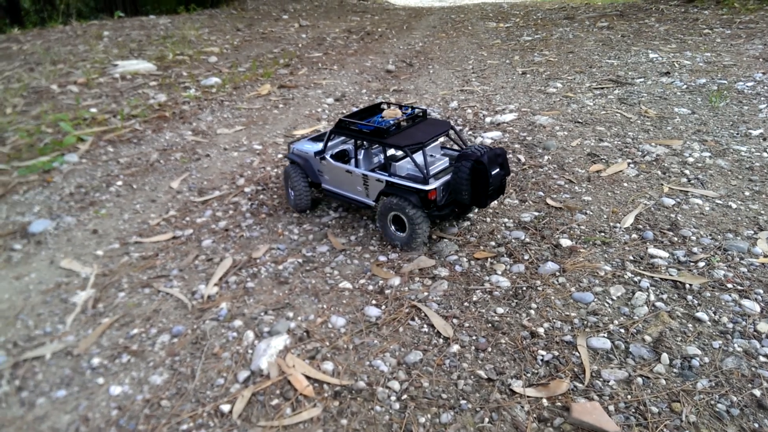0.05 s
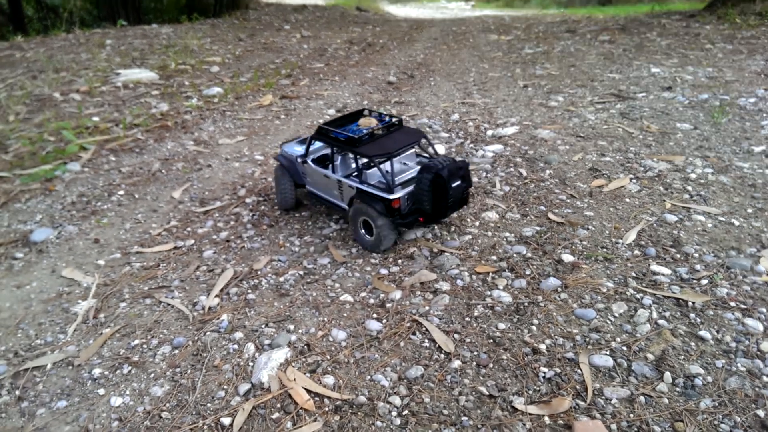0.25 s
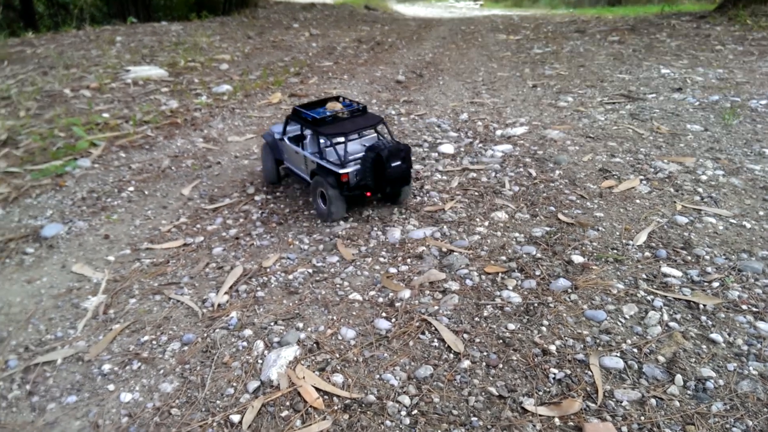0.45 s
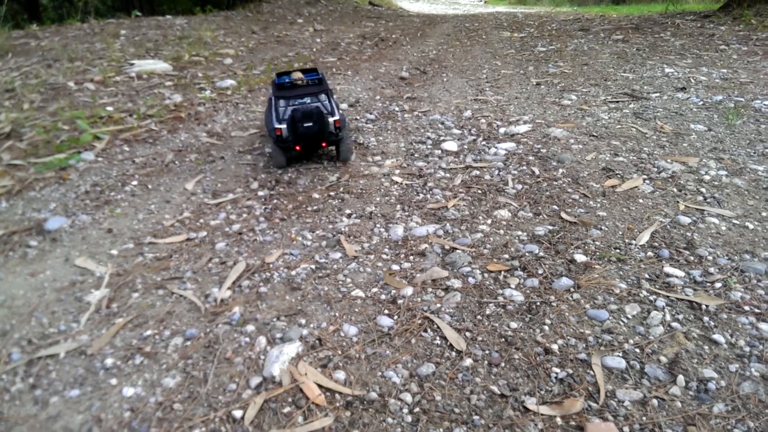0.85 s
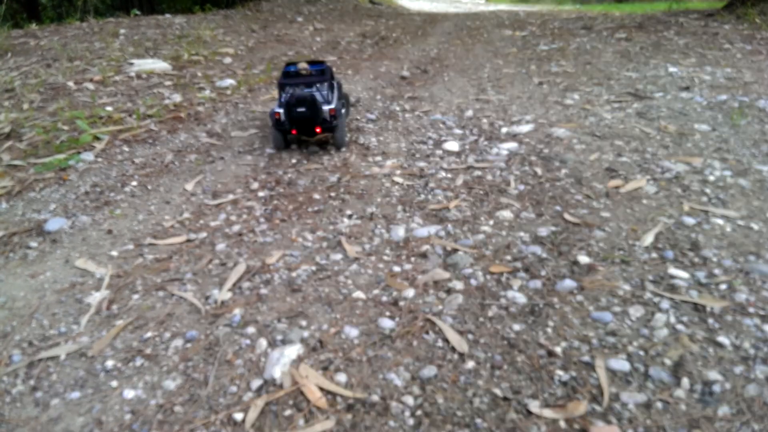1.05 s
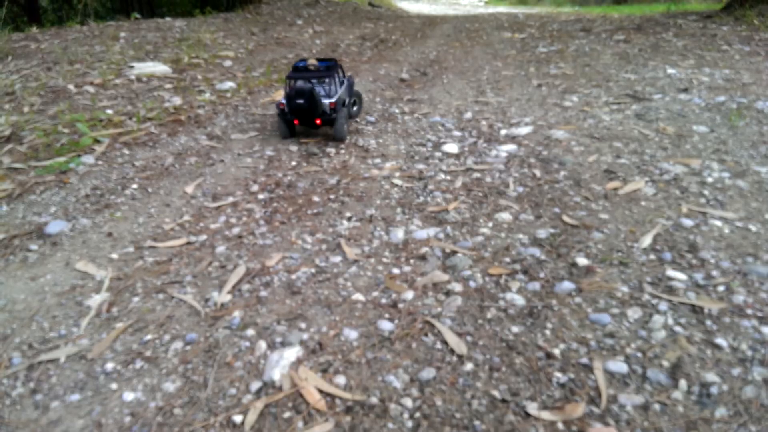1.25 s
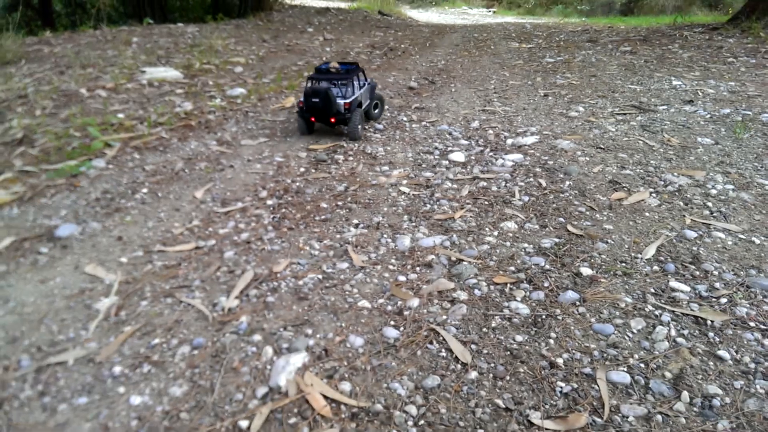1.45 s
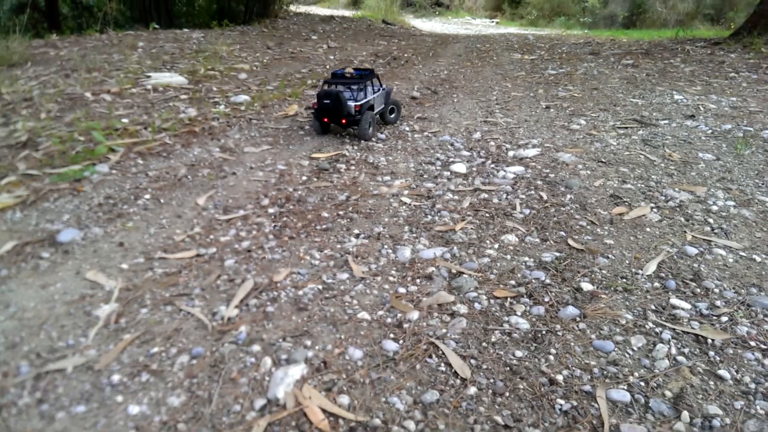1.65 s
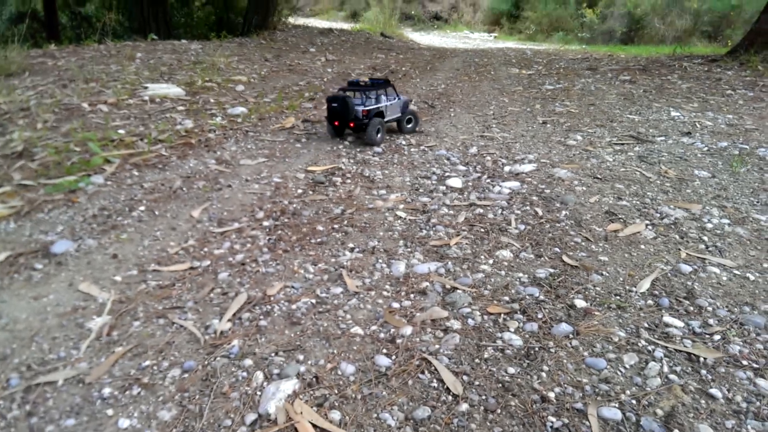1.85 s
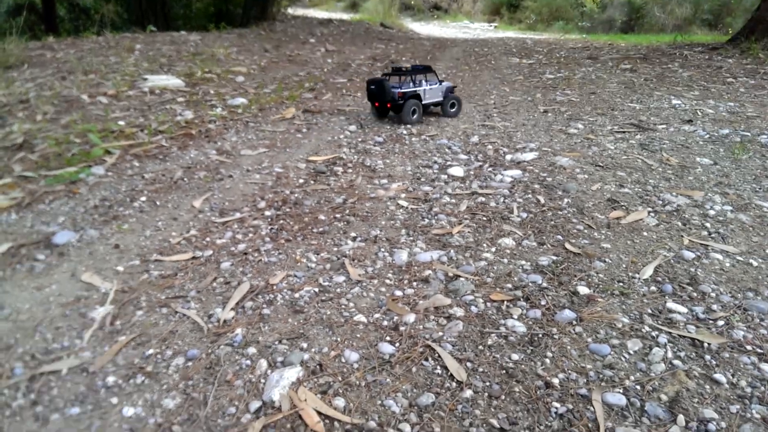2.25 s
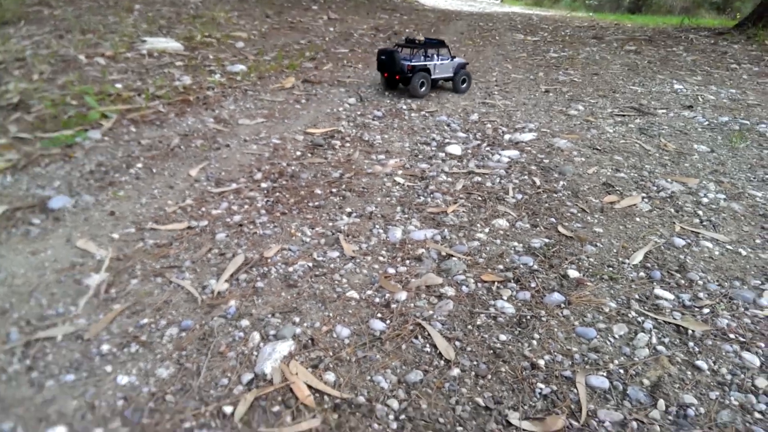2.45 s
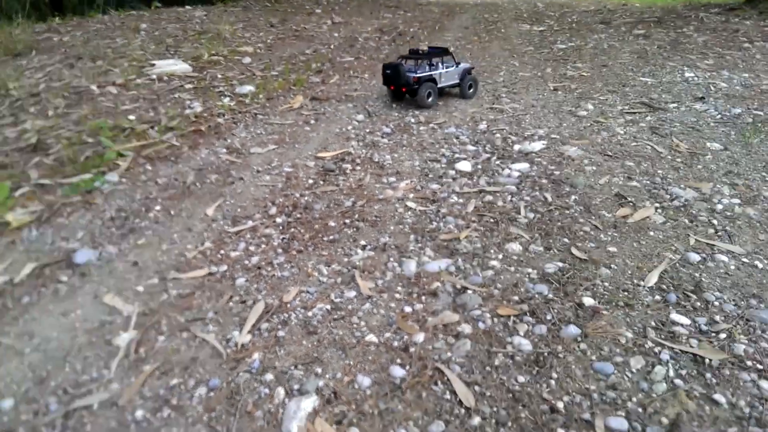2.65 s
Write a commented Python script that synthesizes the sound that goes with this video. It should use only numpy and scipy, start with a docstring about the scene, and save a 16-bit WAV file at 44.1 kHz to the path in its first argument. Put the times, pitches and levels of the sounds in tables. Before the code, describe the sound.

The electric motor and gears of a toy car whine and rasp in uneven bursts on a quiet gravel path, slightly to the left. Small stones scrape under the tyres, and loose parts clack as it slows.

```python
"""The gears of a radio-controlled toy truck whine as it drives over gravel in bursts of throttle.
Meshing teeth make a harmonic tone, and their backlash rasps and excites the resonant plastic body.
The free-running motor sings, and the speed controller's switched current whistles thinly.
Tyres rumble, crunch and scuff, pebbles scrape and loose chassis parts clack over quiet outdoor air."""
import sys
import numpy as np
from scipy.fft import rfft, irfft, next_fast_len
from scipy.io import wavfile
from scipy.ndimage import uniform_filter1d, map_coordinates

SR = 44100
rng = np.random.default_rng(int(sys.argv[2]) if len(sys.argv) > 2 else 0)


def pcm_store(signal):
    """Save signal as 16-bit PCM."""
    levels = np.round(np.clip(np.atleast_2d(signal), -1, 1) * 32767)
    wavfile.write(sys.argv[1], SR, levels.astype(np.int16).T)


N = 119070
T = np.arange(N) / SR

# Spectra of the air, tyres, grit, mesh tone, its overtones and the gear rasp.
# Each row: frequency in Hz, gain in dB.
AIR_SPECTRUM = [(25, -4.5), (60, -0.5), (200, 1), (600, -5), (1000, -3), (1500, -1), (2500, -6.5),
                (4500, -11), (7000, -19.5), (10000, -19), (12300, -20.5), (15800, -27)]
ROLL_SPECTRUM = [(25, -67), (70, -10), (150, -2), (400, 2.5), (700, 3.5), (1100, -1.5), (2200, 0.5),
                 (4000, -19), (9000, -48)]
GRIT_SPECTRUM = [(500, -25), (2000, -37), (4500, 15), (7000, 8), (9800, -5), (12300, 9), (15500, -1)]
WHINE_SPECTRUM = [(300, -49), (600, 4.5), (950, -5.5), (1200, 2.5), (1680, 0.5), (1850, -2.5), (2100, -12)]
OVERTONE_SPECTRUM = [(600, -12), (1000, -8), (1350, 9), (1800, 1.5), (2250, 1.5), (2700, 2.5), (3300, -3.5),
                     (3800, -1.5), (4800, 0.5), (5250, -11), (7000, -6), (10000, -25)]
RASP_SPECTRUM = [(800, -21), (2000, -12), (3200, -4), (3800, 2.5), (4800, 3.5), (5300, -13), (6800, -13),
                 (9000, -28), (16000, -16)]
# Envelopes of the rumble, grit, controller and rasp. Each row: time in seconds, relative level in dB.
ROLL_LEVEL = [(0, -72), (.45, -53), (1, -61.5), (2.36, -62), (2.48, -69), (2.65, -64)]
GRIT_LEVEL = [(0, -81), (.28, -88), (.34, -68.5), (.52, -66.5), (.68, -72.5), (.8, -73.5), (1.1, -75.5),
              (1.52, -82), (1.62, -74.5), (2.18, -72), (2.3, -74.5), (2.55, -72.5), (2.7, -78)]
WHISTLE_LEVEL = [(0, -62), (.2, -66), (.38, -63), (.55, -75), (1.08, -73), (1.115, -85), (1.127, -67),
                 (1.42, -73.5), (1.5, -82.5), (2.24, -68), (2.34, -100)]
RASP_LEVEL = [(.15, -80), (.19, -57.5), (.28, -55.5), (.35, -43.5), (.5, -51.5), (.7, -56.5), (.75, -66),
              (.85, -52.5), (1, -70), (1.07, -55), (1.16, -73), (1.24, -68), (1.33, -60.5), (1.52, -74),
              (1.6, -54), (1.75, -56), (2.19, -51.5), (2.23, -60.5), (2.7, -68)]
# Likeness of the two channels. Each row: frequency in Hz, correlation.
COHERENCE = [(30, 0.52), (250, 0.89), (1000, 0.73), (2500, .5), (5000, -0.16), (9000, 0.02), (15000, -0.04)]
# Stereo balance of the drive. Each row: frequency in Hz, left minus right in dB.
DRIVE_BALANCE = [(450, 9), (740, 0.5), (1220, 6.5), (2010, 3), (3330, -5), (5500, -1), (9080, 2),
                 (15000, -3)]
# Pebbles under the tyres. Each row: centre in seconds, relative level in dB.
PEBBLE_SCRAPES = [(.492, -55.5), (0.634, -59), (0.669, -56.5), (.72, -60), (.855, -60), (0.954, -55.5),
                  (1.075, -62.5)]
# Wheels in hollows. Each row: start in seconds, level in dB, band centre in Hz.
SCUFFS = [(0.473, -53, 454), (0.499, -51.5, 650), (1.686, -51, 420), (1.75, -61, 109), (2.17, -49.5, 588)]
# Chassis impacts. Each row: start in seconds, peak in dB, spectral tilt in dB per octave.
IMPACTS = [(.72, -41.5, 5), (1.2997, -33.5, 5), (1.308, -38.5, 3), (2.3872, -22.5, 5.5), (2.391, -33, -1.5),
           (2.3974, -28, -3), (2.399, -30, 2), (2.406, -30, -0.5), (2.511, -46, 5), (2.561, -41, -4)]
# Chassis modes. Each row: frequency in Hz, relative level in dB, time to fall 60 dB in seconds.
CHASSIS_MODES = [(551.8, -11, 0.13), (1492, -6, 0.055), (1684, 8.5, 0.031), (2440, -15, 0.12),
                 (3420, -6, 0.083), (4420, -3, 0.036), (5720, -30, 0.0087)]
# The motor's high note. Each row: time in seconds, frequency in Hz, relative level in dB.
MOTOR_NOTE = [(.24, 3980, -57), (.29, 4260, -65), (.345, 4250, -49.5), (.385, 4750, -58.5),
              (.44, 4720, -59.5), (.475, 4756, -53), (.54, 4767, -55), (.57, 4554, -56), (.6, 4760, -54),
              (.645, 4880, -57), (.665, 5170, -60), (.7, 4575, -63), (.735, 4600, -93), (.752, 5296, -67),
              (.768, 5070, -50.5), (.79, 4910, -50), (.83, 4850, -53.5), (.86, 4560, -56),
              (.878, 4850, -61.5), (.925, 4850, -63)]
# Resonances of the plastic body. Each row: centre in Hz, half-width in Hz, gain in dB.
BODY_MODES = [(637, 63, -11), (1292, 115, -1), (1658, 81, 0.5), (2225, 75, -2.5)]
# Gear speed. Each row: time in seconds, tooth-mesh frequency in Hz.
MESH_RATE = [(0, 608.4), (.05, 688), (.16, 482.7), (.22, 564.8), (.3, 950), (.345, 1400), (.375, 1574),
             (.41, 1636), (.46, 1856), (.56, 1949), (.76, 1930), (.845, 1733), (.88, 1563), (1.03, 1656),
             (1.068, 1575), (1.087, 1409), (1.12, 1325), (1.19, 1414), (1.28, 1269), (1.39, 1314),
             (1.5, 1049), (1.57, 1198), (1.68, 1409), (1.727, 1652), (1.757, 1372), (1.8, 1575),
             (1.86, 1676), (1.917, 1610), (1.94, 1657), (1.98, 1576), (2.05, 1603), (2.095, 1681),
             (2.16, 1568), (2.22, 1388), (2.46, 969), (2.53, 941), (2.62, 1237), (2.7, 1334)]
# Overtones of the mesh. Each row: harmonic number, relative level in dB.
MESH_HARMONICS = [(2, -5), (3, -5), (4, -11), (5, -12), (6, -16.5), (7, -11)]
# Bursts of load on the gears. Each row: start and end in seconds, first and last level in dB,
# overtone and backlash offsets in dB, tooth phase scatter in radians.
LOAD_BURSTS = [(0.024, 0.08, -58.5, -62.5, -14, 1.5, .15), (0.204, 0.255, -54.5, -54.5, 0, -2, 0.12),
               (.28, 0.324, -52, -45, -3.5, -8, .12), (0.33, 0.426, -45.5, -39, -3.5, .5, 0.39),
               (0.437, .84, -46.5, -63, -11, 4, .55), (0.851, 0.913, -43.5, -57, -13.5, 7.5, 0.24),
               (1.036, 1.121, -45.5, -49, -16, 4, 0.35), (1.19, 1.269, -52.5, -46, -12.5, 5, .4),
               (1.388, 1.487, -51, -47, -14, 2.5, 0.31), (1.559, 1.681, -41.5, -39, -13.5, -7, 0.19),
               (1.709, 1.829, -43.5, -43, -7, -2, .25), (1.855, 2.192, -40, -44.5, -8, -2.5, 0.26),
               (2.429, 2.496, -55.5, -62.5, -16, -10, 0.083), (2.608, 2.702, -68, -70, 1, 8, 0.26)]
# Teeth biting hard. Each row: centre in seconds, half-length in seconds, relative level in dB.
TOOTH_BITES = [(0.344, .014, -36.5), (.397, 0.02, -40), (0.814, 0.0054, -45), (0.856, 0.008, -34.5),
               (1.268, 0.01, -43.5), (1.731, 0.0091, -36.5), (1.757, 0.0041, -40), (2.206, .004, -46.5)]
# Wheels losing grip, so that the gears go slack. Each row: centre in seconds, gain in dB.
WHEEL_SLIPS = [(.366, 0.5), (1.703, -0.5), (1.836, -8.5), (1.931, -8.5), (2.184, -14)]


def amp(db):
    """Decibels to amplitude ratio."""
    return 10 ** (np.asarray(db) / 20)


def unit(x):
    """Normalisation to rms 1."""
    return x / np.sqrt(np.mean(x ** 2) + 1e-20)


def along(points, hz):
    """Interpolation of (Hz, value) points on a logarithmic axis."""
    f, v = np.transpose(points)
    return np.interp(np.log(hz + 1), np.log(f + 1), v)


def curve(rows, column=1):
    """Linear interpolation of a timed table at every sample."""
    rows = np.asarray(rows)
    return np.interp(T, rows[:, 0], rows[:, column])


def wobble(rate):
    """Smooth random modulation with rate knots a second."""
    return map_coordinates(rng.standard_normal(int(N * rate / SR) + 4), [T * rate])


def phase_of(hz):
    """Phase as the integral of frequency."""
    return 2 * np.pi * np.cumsum(hz) / SR


def filtered(x, response):
    """Linear filtering: the spectrum of x times a frequency response."""
    size = next_fast_len(N + SR // 4)
    return irfft(rfft(x, size) * response(np.fft.rfftfreq(size, 1 / SR)), size)[..., :N]


def coloured(x, spectrum):
    """Spectral shaping by (Hz, dB) points."""
    return filtered(x, lambda hz: amp(along(spectrum, hz)))


def spread(pair):
    """Partial coherence: two independent signals become normalised stereo, most alike in the low mids."""
    angle = lambda hz: np.arccos(np.clip(along(COHERENCE, hz), -1, 1)) / 2
    mid, side = filtered(pair, lambda hz: np.array([np.cos(angle(hz)), np.sin(angle(hz))]))
    return np.array([mid + side, mid - side]) / np.std(mid)


def panned(x, balance, left_lead_s=0):
    """Level and time differences between the channels give a direction."""
    sides = np.array([[.5], [-.5]])
    delay = lambda hz: np.exp(2j * np.pi * hz * sides * left_lead_s)
    return filtered(x, lambda hz: amp(sides * along(balance, hz)) * delay(hz))


def noise():
    """Two independent white noises."""
    return rng.standard_normal((2, N))


def grains(rate):
    """Shot noise of shifting gravel: on average rate impulses a second, of uneven size."""
    return noise() * (rng.random(N) < rate / SR)


def outdoor_air():
    """Stationary broadband noise forms the quiet background."""
    return amp(-62) * spread(coloured(noise(), AIR_SPECTRUM))


def tyres():
    """Rolling contact: rubber rumbles over the ground while grit hisses and crackles under it."""
    rumble = spread(coloured(noise() + 0.84 * unit(grains(rate=350)), ROLL_SPECTRUM))
    hiss = amp(2 + 2.2 * wobble(45.6)) * spread(coloured(noise(), GRIT_SPECTRUM))
    crunch = amp(-3.5) * spread(coloured(grains(rate=530), GRIT_SPECTRUM))
    return amp(curve(ROLL_LEVEL) + 1) * rumble + amp(curve(GRIT_LEVEL)) * (hiss + crunch)


def pebbles(half_s=0.018):
    """Friction: each pebble squeezed aside gives a short, bright swell of dense impulses."""
    spectrum = [(300, -6), (1500, 11.5), (4200, 3), (7000, -3), (10000, -7.5), (12500, 5.5), (16000, -8)]
    swell = sum(amp(db) * np.exp(-((T - s) / half_s) ** 2) for s, db in PEBBLE_SCRAPES)
    return swell * spread(coloured(grains(rate=1600), spectrum))


def wheel_scuffs(rise_s=0.008, octaves=1.6):
    """Soft impact: landing tyres push gravel aside in a pulse of low-frequency noise."""
    out = np.zeros(N)
    for start, db, centre_hz in SCUFFS:
        age = np.maximum(T - start, 0) / rise_s
        scuff = filtered(noise()[0], lambda hz: np.exp(-(np.log2((hz + 1) / centre_hz) / octaves) ** 2))
        out += amp(db) * age * np.exp(1 - age) * unit(scuff)
    return out


def chassis_clacks(crack_t60=0.015):
    """Impact excitation: loose parts strike with a crack of noise and ring in damped modes."""
    crack_spectrum = [(300, -21), (1500, 27), (5500, 22.5), (7000, 6), (15000, 0.5)]
    out = np.zeros((2, N))
    for start, peak_db, tilt in IMPACTS:
        age = np.maximum(T - start, 0)
        ring = np.zeros(N)
        for mode_hz, db, t60 in CHASSIS_MODES:
            decay = amp(db + rng.normal(0, 2) - 60 * age / t60)
            ring += decay * np.sin(2 * np.pi * mode_hz * (1 + rng.normal(0, .015)) * age)
        burst = noise() * (T >= start) * amp(-60 * age / crack_t60)
        crack = amp(-5) * coloured(burst, crack_spectrum)
        hit = filtered(ring + crack, lambda hz: amp(tilt * np.log2(np.clip(hz, 800, 5000) / 3000)))
        out += amp(peak_db) * hit / np.abs(hit).max()
    return out


def speed_controller(switching_hz=5947):
    """Switched current excites a thin whistle of nearly constant frequency."""
    tone = np.sqrt(2) * np.sin(phase_of(switching_hz + 5 * wobble(30.7)))
    return tone * amp(curve(WHISTLE_LEVEL) + 1.4 * wobble(21.29))


def motor(jitter=0.0081, flutter=0.23):
    """Free rotation gives a high note, roughened by random frequency and amplitude modulation."""
    running = (T > MOTOR_NOTE[0][0]) & (T < MOTOR_NOTE[-1][0])
    tone = np.sqrt(2) * np.sin(phase_of(curve(MOTOR_NOTE) * (1 + jitter * wobble(600))))
    envelope = amp(curve(MOTOR_NOTE, column=2) + 2.2 * wobble(140)) * running
    return tone * envelope * (1 + flutter * wobble(520))


def body_response(hz):
    """Resonance: each mode of the plastic shell adds a Lorentzian peak."""
    return sum(amp(db) / (1 + ((hz - centre) / width) ** 2) for centre, width, db in BODY_MODES)


def gear_loads(attack_s=0.01, release_s=0.011):
    """Tooth load sets the gains of the mesh tone, overtones and backlash; bites add to the first."""
    gains = np.zeros((3, N))
    for start, end, first_db, last_db, overtone_db, backlash_db, _ in LOAD_BURSTS:
        gate = np.exp(np.minimum(T - start, 0) / attack_s - np.maximum(T - end, 0) / release_s)
        gain = amp(np.interp(T, [start, end], [first_db, last_db])) * gate
        gains = np.maximum(gains, [gain, gain * amp(overtone_db), gain * amp(backlash_db)])
    bites = sum(amp(db) * np.exp(-((T - s) / half) ** 4) for s, half, db in TOOTH_BITES)
    return gains[0] + bites, gains[1], gains[2]


def throb(shaft, depth=0.14, flutter_db=1.95):
    """Amplitude modulation: the uneven mesh swells once and twice per shaft turn, and flutters."""
    swell = np.cos(shaft + wobble(39.52)) + np.cos(2 * shaft + wobble(40))
    return unit((1 + depth * swell) * amp(flutter_db * wobble(330)))


def gear_overtones(mesh, shaft, scatter_rad=0.37, breakup_db=2):
    """Periodic tooth contact yields harmonics, each wandering in phase and level."""
    out = np.zeros(N)
    for harmonic, db in MESH_HARMONICS:
        tone = np.sin(harmonic * mesh + scatter_rad * wobble(600))
        out += amp(db) * unit(tone * throb(shaft) * amp(breakup_db * wobble(70)))
    return coloured(out, OVERTONE_SPECTRUM)


def backlash(shaft, gain, reference_db=-51.5, growth=0.72):
    """Play between the teeth makes noise, pulsed by the shaft, that rattles the body and rasps."""
    knocks = lambda: noise() * (1 + .5 * np.cos(shaft)) * amp(3.35 * wobble(140))
    rattle_gain = amp(reference_db - 6.5) * (gain / amp(reference_db)) ** growth
    rattle = rattle_gain * spread(filtered(knocks(), body_response))
    rasp = amp(curve(RASP_LEVEL) - 8) * spread(coloured(knocks(), RASP_SPECTRUM))
    return rattle + rasp


def gears(teeth=12, jitter=0.00985, slip_half_s=0.0065):
    """Forced vibration: gears whine at the tooth-mesh frequency, louder under load, dipping in slips."""
    mesh_hz = uniform_filter1d(curve(MESH_RATE), size=500) * (1 + jitter * wobble(300))
    mesh = phase_of(mesh_hz)
    shaft = mesh / teeth
    scatter = curve([(s, radians) for start, end, *_, radians in LOAD_BURSTS for s in (start, end)])
    mesh = mesh + scatter * wobble(520)
    whine_gain, overtone_gain, backlash_gain = gear_loads()
    partial = lambda harmonic: unit(np.sin(harmonic * mesh) * throb(shaft))
    whine = amp(-3) * whine_gain * coloured(partial(1), WHINE_SPECTRUM)
    octave = amp(-2.5) * backlash_gain * filtered(partial(2), body_response)
    overtones = amp(-1.5) * overtone_gain * gear_overtones(mesh, shaft)
    slip_db = sum(db * np.exp(-((T - s) / slip_half_s) ** 2) for s, db in WHEEL_SLIPS)
    return amp(slip_db) * (whine + octave + overtones + backlash(shaft, backlash_gain))


def scene():
    """Superposition of the truck, a little to the left, the gravel and the outdoor air."""
    drive = panned(gears() + motor() + speed_controller(), DRIVE_BALANCE, left_lead_s=4e-5)
    ground_balance = [(700, -1), (1300, 8), (4000, -9), (8000, 2.5), (13000, 7)]
    ground = panned(tyres() + pebbles(), ground_balance)
    return drive + ground + wheel_scuffs() + chassis_clacks() + outdoor_air()


def record(dry):
    """Band limiting: an ideal low-pass filter removes the highest treble."""
    return filtered(dry, lambda hz: hz < 15950)


dry = scene()
out = record(dry)
pcm_store(out)
```